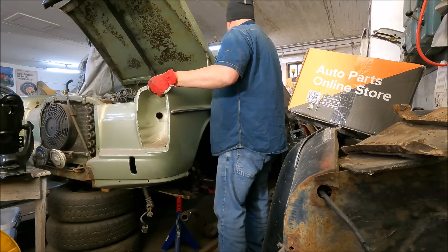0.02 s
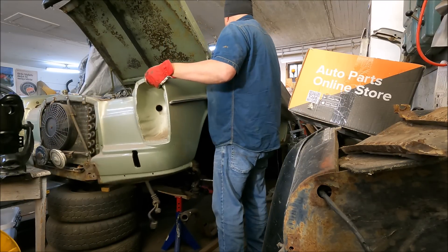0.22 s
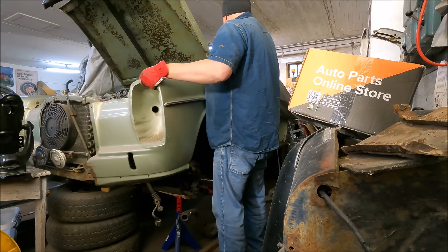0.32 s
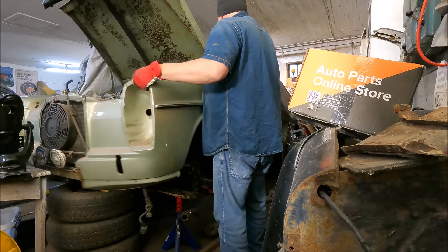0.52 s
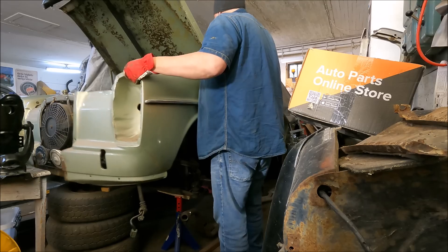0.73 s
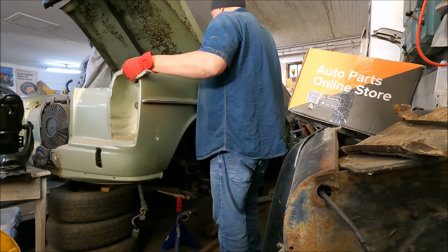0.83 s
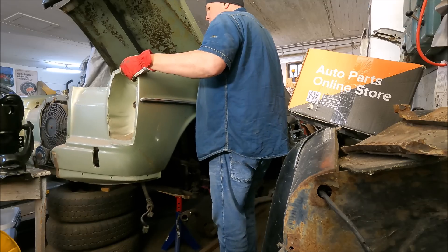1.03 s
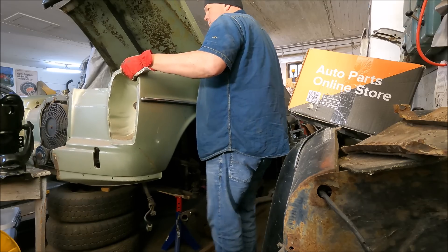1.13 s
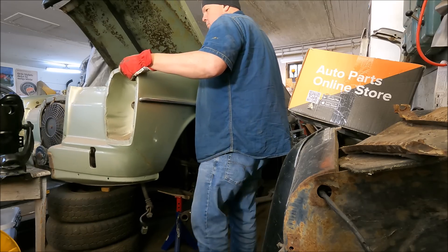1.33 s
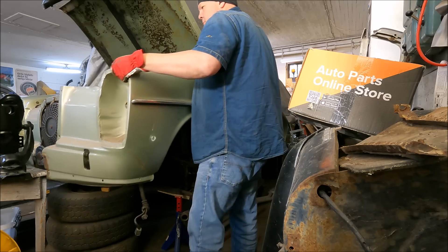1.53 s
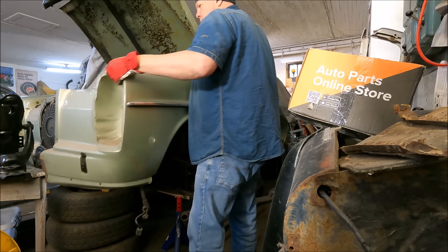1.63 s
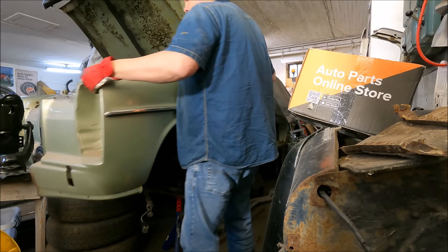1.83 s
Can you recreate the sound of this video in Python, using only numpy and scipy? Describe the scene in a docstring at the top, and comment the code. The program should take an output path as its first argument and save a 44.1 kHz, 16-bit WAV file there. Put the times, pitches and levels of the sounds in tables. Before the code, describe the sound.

A loose metal fender booms and crashes as it is pulled off a car in a garage. The ringing fades into light scraping and small clicks of bolts and edges, while a fan motor hums quietly throughout.

```python
"""A loose sheet-metal fender is pulled off a car in a cluttered garage.
A fan motor hums from start to finish. First the panel bends a little and its edges drag in tiny slips.
At about 0.25 s it breaks free: bending makes it boom, and a quick run of knocks makes it crash and ring.
From about 0.5 s on it is lifted away, with scrapes, soft bumps and small ticks of bolts and edges."""
import sys
import numpy as np
from scipy import signal
from scipy.fft import rfft, irfft, next_fast_len
from scipy.io import wavfile
from scipy.ndimage import uniform_filter1d, minimum_filter1d, map_coordinates

SR = 44100
rng = np.random.default_rng(int(sys.argv[2]) if len(sys.argv) > 2 else 0)


def log_audio(samples):
    """Write samples as a 16-bit WAV file to the path given in sys.argv[1]."""
    # one column per channel
    frames = np.atleast_2d(samples).T
    # limit to full scale, then quantise
    limited = np.clip(frames, -1, 1)
    pcm = np.round(limited * 32767).astype(np.int16)
    wavfile.write(sys.argv[1], SR, pcm)


N = 83790  # 1.9 s


def amp(db):
    """Turn decibels into a number to multiply by."""
    return 10 ** (np.asarray(db) / 20)


def unit(x):
    """Scale x to an average size (rms) of 1."""
    return x / np.sqrt(np.mean(x ** 2) + 1e-20)


def along(points, hz):
    """Read a curve of (frequency, value) points at hz, with octaves evenly spaced."""
    f, values = np.transpose(points)
    return np.interp(np.log(hz + 1), np.log(f + 1), values)


def wobble(rate):
    """A smooth random curve through `rate` points a second."""
    points = rng.standard_normal(int(N * rate / SR) + 4)
    return map_coordinates(points, [np.arange(N) * rate / SR])


def filtered(x, response):
    """Turn each frequency in x up or down by response(frequency)."""
    n = x.shape[-1]
    padded = next_fast_len(n + 4096)
    return irfft(rfft(x, padded) * response(np.fft.rfftfreq(padded, 1 / SR)), padded)[..., :n]


def soften(hz, cutoff_hz):
    """A softer touch makes less treble: the gain drops above the cutoff."""
    return 1 / np.sqrt(1 + (hz / cutoff_hz) ** 8)


def peaks(table, hz):
    """Gain of resonances: each lifts or lowers the frequencies near its centre."""
    return amp(sum(db / (1 + (2 * (hz - centre) / width) ** 2) for centre, width, db in table))


def add(out, start, x):
    """Mix x into out, beginning at `start` seconds."""
    i = round(start * SR)
    out[:, i:i + x.shape[-1]] += x[:, :N - i]


# How wide the sound is: f/Hz, side level compared with mid/dB
STEREO_WIDTH = [(100, -23), (250, -16.5), (500, -13), (1000, -10), (2000, -6.5), (4000, -6.5),
                (8000, -10.5), (12000, -4)]
def side_gain(hz):
    """Sounds here have two rows: mid (what both ears share) and side (how they differ, at this gain)."""
    return amp(along(STEREO_WIDTH, hz))


def mid_side(hz):
    """The gains of both rows."""
    return np.array([np.ones_like(hz), side_gain(hz)])


def noise(n, spectrum):
    """Make n samples of mid and side noise with the given tone colour; the mid has rms 1."""
    pair = filtered(rng.standard_normal((2, n)), lambda hz: amp(along(spectrum, hz)) * mid_side(hz))
    return pair / pair[0].std()


# Tone colour of the rushing air: f/Hz, level/dB
AIR_SPECTRUM = [(25, -8), (70, -12), (105, -17), (150, 0.5), (300, 1), (400, -7.5), (480, -18),
                (600, -12.5), (800, -28.5), (1400, -22.5), (3000, -34), (7000, -34), (9000, -40.5),
                (12500, -49), (14500, -67)]
# Tones of the motor: f/Hz, level/dB
MOTOR_TONES = [(154, -57), (179, -62.5), (206, -66.5), (232, -98), (283.5, -59), (291, -61.5), (308.5, -64),
               (360, -70), (409, -69), (539, -81.5)]
def fan():
    """A fan motor hums with wavering tones over a soft rush of air."""
    air_db, waver_db, drift_rad = -57.5, 0.5, 0.38
    t = np.arange(N) / SR
    out = amp(air_db) * noise(N, AIR_SPECTRUM)
    for hz, db in MOTOR_TONES:
        phase = 2 * np.pi * (hz * t + rng.random()) + drift_rad * wobble(27)
        side = side_gain(hz) * np.sin(phase + 2 * np.pi * rng.random())
        strength = np.sqrt(2) * amp(db + waver_db * wobble(11))
        out += strength * np.array([np.sin(phase), side])
    return out


# The panel's own low notes: f/Hz, level/dB, time to fade by 60 dB/s
LOW_NOTES = [(44, 2, 0.88), (67.3, 3, 0.39), (81, -4, .5), (98.6, 2.5, 0.35), (145.24, -2, 0.52),
             (167.4, 2, 0.26), (226.1, -6.5, 0.55), (273.7, -9.5, 0.36), (337.8, -2, 0.46), (392.7, 0, .5)]
# Bends of the whole panel: t/s, level/dB, centre f of the notes it wakes/Hz
BENDS = [(.003, -55.5, 75), (0.096, -57.5, 60), (0.169, -40.5, 130), (0.2467, -21.5, 137),
         (0.2639, -11, 152.8), (.275, -30, 76.5), (.292, -23.5, 383), (.322, -24, 221), (.326, -17.5, 105),
         (0.341, -30, 426), (0.373, -16.5, 84.7), (.418, -16.5, 161), (0.423, -28, 60), (.497, -25, 223),
         (.55, -32.5, 89.1), (0.627, -33, 140), (0.634, -35.5, 65), (0.744, -39, 64), (0.807, -41, 91),
         (0.864, -40.5, 102), (0.948, -45, 65), (1.189, -53, 59.5), (1.324, -42.5, 83.5), (1.367, -58, 85),
         (1.79, -58, 65)]
def boom():
    """The panel bends and booms; where it is pushed decides which low notes sound."""
    reach_octaves, rise_s = 0.38, 0.0056
    out, t = np.zeros((2, N)), np.arange(SR) / SR
    hz, db, t60 = np.transpose(LOW_NOTES)
    notes = np.sin(2 * np.pi * hz[:, None] * t) * fade(t, t60[:, None])
    for start, level, centre_hz in BENDS:
        octaves_away = np.log2(hz / centre_hz)
        push = amp(level + db) * np.exp(-.5 * (octaves_away / reach_octaves) ** 2)
        side = side_gain(hz) * rng.standard_normal(len(hz))
        thump = np.array([push, push * side]) @ notes
        add(out, start, thump * (1 - np.exp(-t / rise_s)))
    return out


def fade(t, t60):
    """A vibration dies away, losing 60 dB every t60 seconds."""
    return np.exp(-np.log(1000) * t / t60)


# Tone colour of scraping: f/Hz, level/dB
SCRAPE_SPECTRUM = [(40, 5), (100, 3), (200, 6.5), (500, -6.5), (800, -6.5), (1300, -1.5), (2100, -3),
                   (2700, -3.5), (3900, -4), (4500, -3), (7200, -3.5), (8300, -8), (12000, -7.5),
                   (14500, -24.5)]
# Resonances that a dragged edge wakes: f/Hz, width/Hz, boost/dB
EDGE_PEAKS = [(520, 46, 5), (735, 45, 4), (2070, 81, 2.5), (2960, 110, 4), (3500, 58, 4), (3950, 80, 5)]
# Drags of an edge: loudest t/s, level/dB, rise/s, fall/s, treble cutoff/Hz
DRAGS = [(0.087, -39, 0.027, 0.069, 4470), (.108, -51, 0.12, 0.013, 10200),
         (0.203, -33.5, 0.035, 0.21, 1400), (.24, -44, 0.068, 0.015, 7260), (0.601, -42, 0.22, 0.14, 2000),
         (.56, -62.5, .08, 0.51, 10720), (.685, -59.5, 0.017, 0.045, 7760), (.745, -46, .06, 0.083, 2290),
         (.812, -57.5, 0.0031, 0.12, 8100), (.876, -50, 0.063, .028, 9200),
         (0.963, -50.5, .03, 0.039, 3800), (1.115, -46.5, 0.012, 0.034, 7000),
         (1.206, -55.5, 0.053, 0.087, 4720), (1.29, -57.5, 0.037, 0.057, 8100),
         (1.334, -52, .012, .03, 7300), (1.374, -53, .014, .016, 8000), (1.43, -63, 0.045, 0.13, 5340),
         (1.815, -59.5, 0.031, 0.12, 5330)]
def scrapes():
    """Edges drag in swells of tiny slips, blurred by a short echo from the sheet and the room."""
    slips_per_s, slip_spread_db = 3000, 4
    echo_t60_s, echo_db = .07, -0.5
    out, t = np.zeros((2, N)), np.arange(N) / SR
    echo_energy = fade(t[:SR // 4], echo_t60_s) ** 2
    for peak_s, level, rise, fall, cutoff_hz in DRAGS:
        slipping = rng.random((2, N)) < slips_per_s / SR
        sizes = amp(slip_spread_db * rng.standard_normal((2, N)))
        slips = slipping * sizes * np.sign(rng.standard_normal((2, N)))
        swell = np.exp(-np.maximum((peak_s - t) / rise, (t - peak_s) / fall))
        lingering = signal.fftconvolve(swell ** 2, echo_energy / echo_energy.sum())[:N]
        echo = amp(echo_db) * np.sqrt(np.abs(lingering)) * rng.standard_normal((2, N))
        out += amp(level) * filtered(swell * unit(slips) + echo, lambda hz: soften(hz, cutoff_hz))

    def grit(hz):
        """The tone colour of a dragged edge."""
        return unit(amp(along(SCRAPE_SPECTRUM, hz)) * peaks(EDGE_PEAKS, hz)) * mid_side(hz)
    return filtered(out, grit) / np.sqrt(2)


# Tone colour of the sheet's many crowded overtones: f/Hz, level/dB
SHEET_SPECTRUM = [(60, -22), (200, -0.5), (400, -3), (800, -6.5), (1300, -1.5), (1800, -6.5), (2300, -7),
                  (2800, -10.5), (4000, -5.5), (4500, -13.5), (5300, -10), (5900, -17), (6900, -10),
                  (7600, -17), (11000, -17), (13000, -22), (14500, -41)]
# How long those overtones last: f/Hz, time to fade by 60 dB/s
SHEET_FADES = [(100, 1), (500, .75), (1300, 0.41), (3000, 0.61), (7000, 0.56), (13000, .45)]
# Resonances of the panel's folded rims: f/Hz, width/Hz, boost or cut/dB
RIM_PEAKS = [(2426, 30, 12.5), (3820, 270, -3.5), (5480, 104, 7.5), (6830, 110, 10.5), (9620, 47, 16.5)]
# The panel's own ringing notes: f/Hz, level/dB, time to fade by 60 dB/s
RING_NOTES = [(466, -14, 0.32), (562.3, -12.5, .56), (589, -16, 0.7), (679, -13, .45), (719.4, -12.5, .4),
              (900, -15.5, .45), (1080, -20.5, 0.38), (1150, -12, 0.45), (1177, -10.5, 0.29),
              (1272, -16, 0.42), (1331, -20.5, 0.8), (2020, -17.5, 0.56), (2683, -17, 0.16),
              (4160, -26, 0.23)]
# Knocks on the panel: t/s, level/dB, treble cutoff/Hz, rise/s
KNOCKS = [(0.2463, -18.5, 1600, 0.00028), (0.2518, -31, 7000, 0.00082), (0.2637, -20, 2500, 0.00033),
          (.267, -25.5, 7000, 0.0018), (.272, -16.5, 8000, 0.001), (.281, -22.5, 13360, 0.0016),
          (.297, -15, 810, 0.0042), (0.309, -29.5, 6740, 0.0043), (0.33, -22.5, 6060, 0.0056),
          (.34, -22.5, 900, .003), (0.3607, -28.5, 8000, .004), (.365, -23, 3500, 0.0013),
          (.374, -17, 2222, 0.0008), (.417, -32, 1400, 0.0014), (0.443, -57, 3500, 0.0006),
          (0.695, -44.5, 1530, 0.00099), (.957, -57.5, 3000, 0.0015), (1.113, -49.5, 1790, 0.0089),
          (1.324, -49.5, 1703, 0.00088), (1.364, -56.5, 2050, 0.0011)]
def clatter():
    """Each knock gives a short crash through the rims, a longer shimmer and clear ringing notes."""
    crash_t60_s, shimmer_db, ring_db, overall_db = 0.096, -10.5, -3, -0.5
    retune = .004  # bending shifts each note by about this share of its pitch from knock to knock
    out, t = np.zeros((2, N)), np.arange(SR) / SR
    hz, db, t60 = np.transpose(RING_NOTES)
    dying = fade(t, t60[:, None])
    for start, level, cutoff_hz, rise in KNOCKS:
        sheet = filtered(noise(SR, SHEET_SPECTRUM), lambda f: soften(f, cutoff_hz))
        crash = filtered(sheet, lambda f: peaks(RIM_PEAKS, f)) * fade(t, crash_t60_s)
        shimmer = amp(shimmer_db) * damped(sheet, SHEET_FADES)
        bent_hz = hz * (1 + retune * rng.standard_normal(len(hz)))
        notes = np.sin(2 * np.pi * (bent_hz[:, None] * t + rng.random((len(hz), 1)))) * dying
        push = amp(db + ring_db) * soften(hz, cutoff_hz)
        side = side_gain(hz) * rng.standard_normal(len(hz))
        ring = np.array([push, push * side]) @ notes
        add(out, start, amp(level + overall_db) * (crash + shimmer + ring) * (1 - np.exp(-t / rise)))
    return out


def damped(x, fade_times):
    """Let each frequency in x die away at its own speed."""
    hz, t, bands = signal.stft(x, SR, nperseg=256)
    faded = bands * fade(t, along(fade_times, hz)[:, None])
    return signal.istft(faded, SR, nperseg=256)[1][:, :x.shape[-1]]


# Tone colour of a tick: f/Hz, level/dB
TICK_SPECTRUM = [(300, -5.5), (1500, -19), (3500, -5.5), (7000, -2), (8500, -9), (12300, -11.5),
                 (13200, -15), (14500, -22.5)]
# Small hard touches: t/s, level/dB, treble cutoff/Hz, rise/s
TOUCHES = [(.679, -56.5, 8900, 0.0014), (0.8036, -48.5, 13000, 0.00031), (0.808, -50.5, 7150, 0.0011),
           (.938, -60.5, 12000, 0.00032), (1.055, -56, 8000, 0.0025), (1.065, -54.5, 7700, 0.0022),
           (1.107, -51.5, 7000, 0.0027), (1.174, -53.5, 11500, .002), (1.203, -54, 3500, 0.0018),
           (1.369, -62, 10000, .003), (1.807, -56.5, 6500, 0.0023), (1.818, -68.5, 6000, .001),
           (1.89, -59, 4500, .001)]
def ticks():
    """Bolts and edges touch with bright little clicks that linger faintly in the room."""
    click_t60_s, room_t60_s, room_db = 0.05, 0.269, -8.5
    out, t = np.zeros((2, N)), np.arange(SR // 2) / SR
    dying = fade(t, click_t60_s) + amp(room_db) * fade(t, room_t60_s)
    for start, level, cutoff_hz, rise in TOUCHES:
        click = filtered(noise(len(t), TICK_SPECTRUM), lambda hz: soften(hz, cutoff_hz))
        add(out, start, amp(level) * dying * (1 - np.exp(-t / rise)) * click)
    return out


# How much louder the left ear is than the right: f/Hz, level/dB
LEFT_EXTRA = [(100, 0.54), (300, 1.4), (1000, 2.2), (4000, 1.4), (8000, 2), (12000, 1.5)]
def scene():
    """Mix all the sounds into left and right; the left is slightly louder and a tiny bit later."""
    left_lag_s = .000012
    mid, side = fan() + boom() + scrapes() + clatter() + ticks()
    left_right = np.array([mid + side, mid - side])
    ears = np.array([[.5], [-.5]])  # each ear takes half of the difference
    return filtered(left_right, lambda hz: amp(ears * along(LEFT_EXTRA, hz))
                    * np.exp(-2j * np.pi * hz * ears * left_lag_s))


def record(dry):
    """A limiter briefly turns down the loudest peaks, then the highest treble is cut off."""
    ceiling, smooth_s, top_hz = 0.56, 0.0014, 14700
    window = int(smooth_s * SR)
    safe_gain = np.minimum(1, ceiling / (np.abs(dry).max(axis=0) + 1e-9))
    gain = uniform_filter1d(minimum_filter1d(safe_gain, 2 * window), window)
    return filtered(dry * gain, lambda hz: hz < top_hz)


dry = scene()
out = record(dry)
log_audio(out)
```